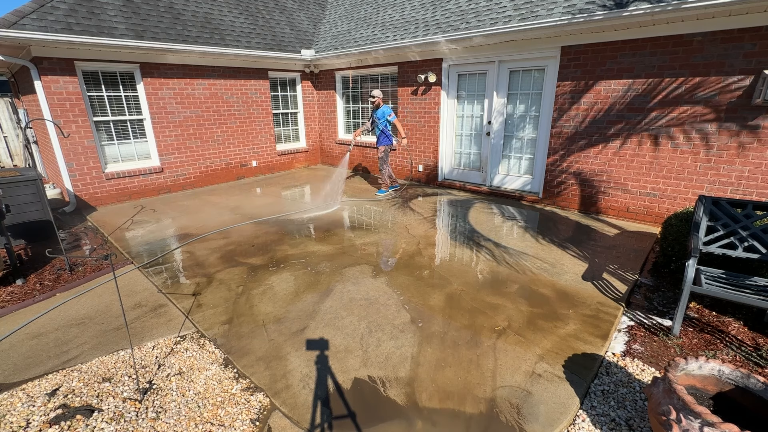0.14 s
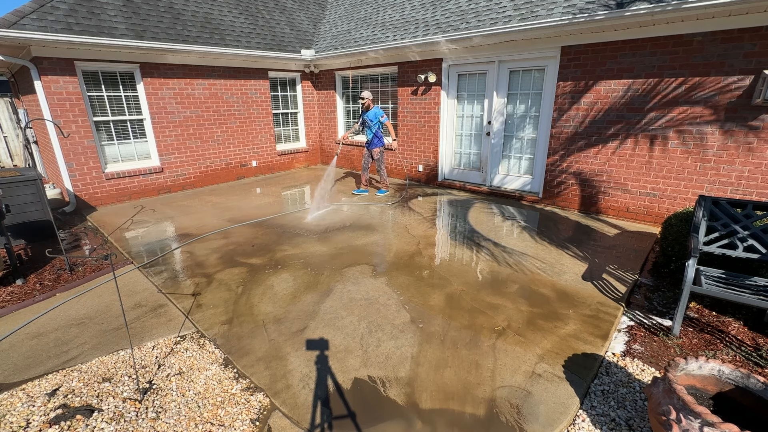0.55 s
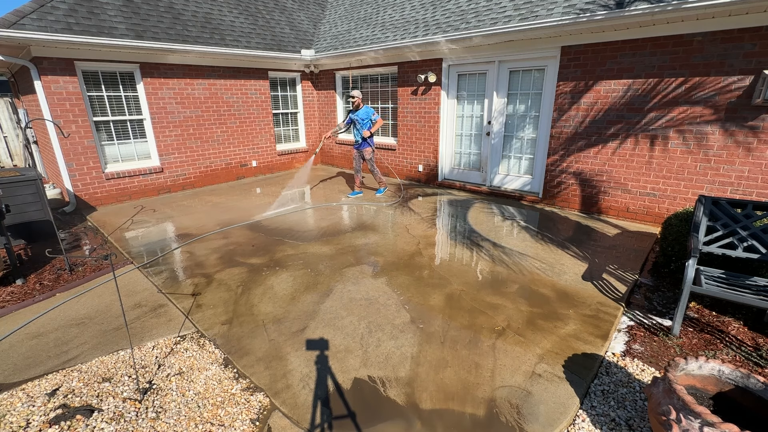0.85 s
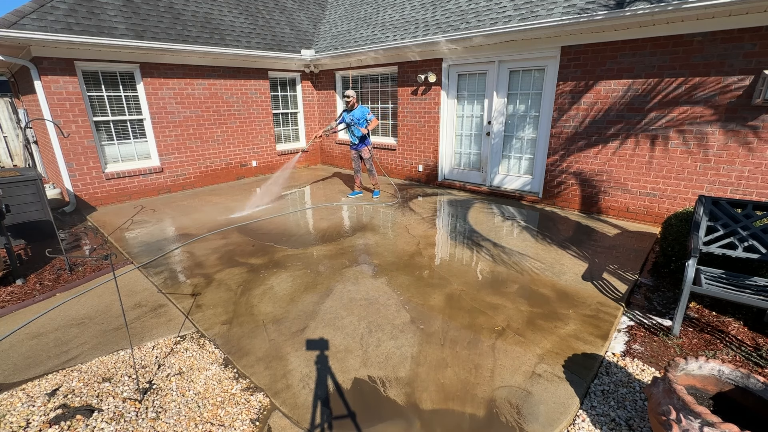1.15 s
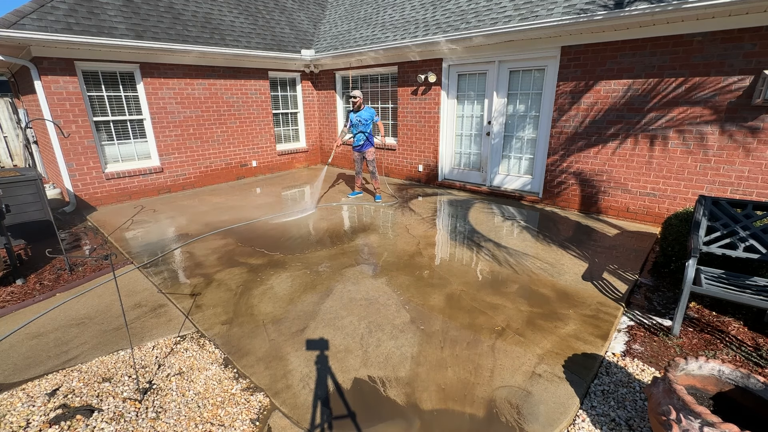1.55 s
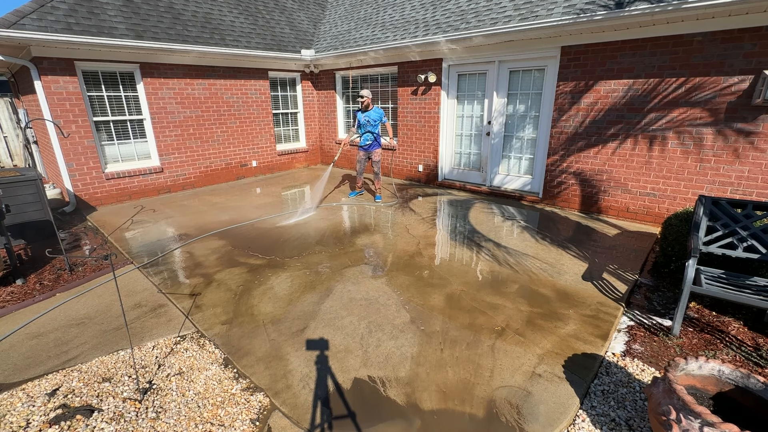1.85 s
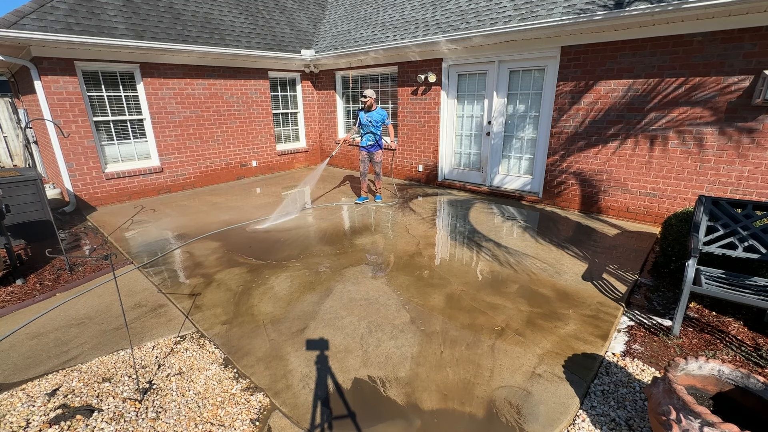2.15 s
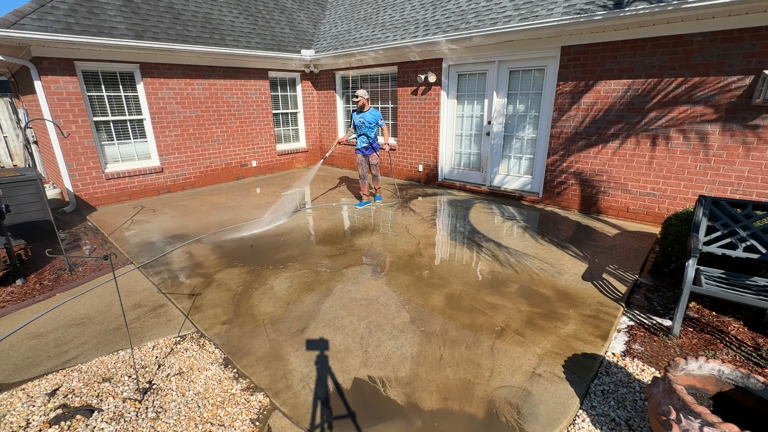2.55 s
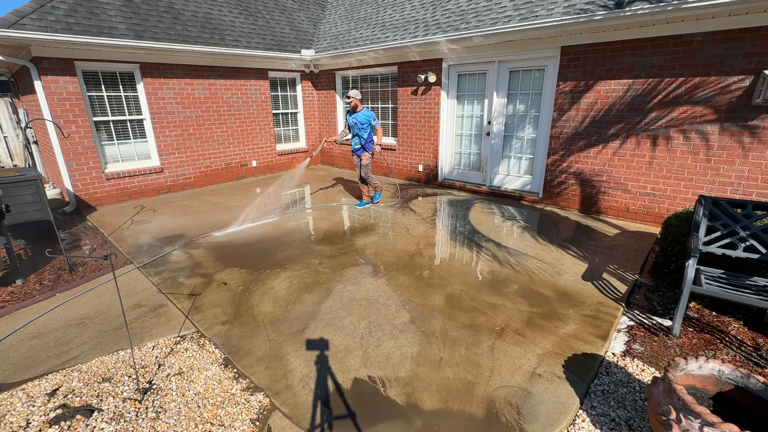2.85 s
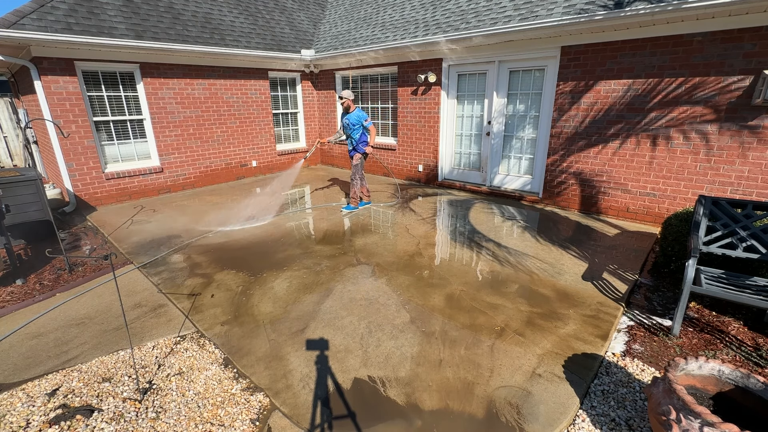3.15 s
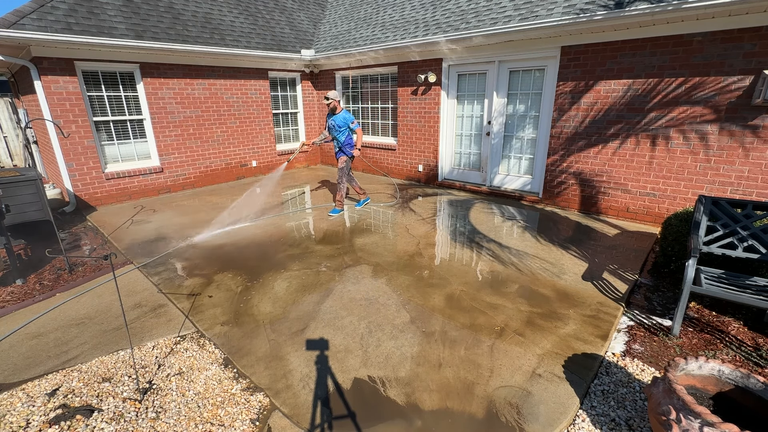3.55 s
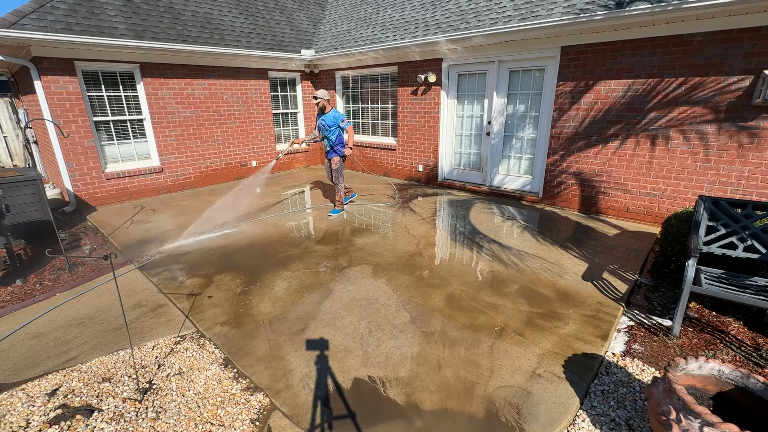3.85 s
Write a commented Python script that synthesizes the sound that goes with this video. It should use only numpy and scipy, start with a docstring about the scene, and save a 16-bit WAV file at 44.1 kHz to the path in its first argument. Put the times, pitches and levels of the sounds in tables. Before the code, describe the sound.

A pressure-washer jet hisses and splashes over wet concrete while small engines drone low behind it.

```python
"""A pressure-washer jet sweeps over wet concrete in a yard, with two small engines droning throughout.
One drop lands nearby at 0.2 s, just before the jet's fizz peaks at 0.3 s; the fizz then rises and falls
over its splash, a fuzzy whistle and a roar, all of shaped noise. The engines and hums are drifting sines
over a noise rumble, strongest near 3.2 s. Short puffs of wind noise recur, the strongest after 3.6 s."""
import sys
import numpy as np
from scipy import signal
from scipy.io import wavfile
from scipy.ndimage import uniform_filter1d

SR = 44100
rng = np.random.default_rng(int(sys.argv[2]) if len(sys.argv) > 2 else 0)


def int16_out(signal):
    """Quantize to a 16-bit WAV file."""
    q = np.round(np.clip(np.atleast_2d(signal).T, -1, 1) * 32767)
    wavfile.write(sys.argv[1], SR, q.astype(np.int16))


N = 176400
SIZE, HOP = 1024, 256  # samples

# The wand's sweep. Each row: time in seconds, jet fizz in dB and slab splash in dB, both before trim.
SWEEP = [(0.0, -31.5, -35.8), (0.1, -31.6, -34.5), (0.2, -30.1, -35.5), (0.27, -28.5, -34.8),
         (0.31, -26.8, -34.9), (0.36, -29.5, -36.1), (0.39, -31.2, -37.5), (0.46, -29.7, -36.2),
         (0.55, -30.1, -35.4), (0.65, -30.8, -35.4), (0.73, -30.1, -33.9), (0.85, -31.6, -34.9),
         (1.0, -31.9, -35.5), (1.17, -33.6, -36.6), (1.24, -31.7, -34.5), (1.3, -33.5, -36.5),
         (1.48, -34.3, -36.6), (1.54, -32.6, -35.8), (1.7, -31.5, -35.8), (1.86, -32.9, -36.4),
         (2.0, -30.6, -35.4), (2.15, -31.9, -36.2), (2.35, -33.6, -36.7), (2.55, -33.2, -36.2),
         (2.76, -32.5, -36.0), (2.93, -31.5, -33.0), (2.98, -33.9, -33.8), (3.2, -34.6, -35.6),
         (3.31, -31.8, -33.9), (3.38, -34.4, -34.7), (3.54, -32.8, -34.9), (3.6, -30.6, -33.4),
         (3.75, -33.6, -35.1), (4.0, -33.7, -35.0)]
# The backdrop. Each row: time in seconds, rumble in dB before trim, roar in dB before trim,
# lift of the roar's swelling band in dB, centre of that band in Hz.
BACKDROP = [(0, -49, -40, 3, 950), (.5, -42.5, -41, 0, 950), (1, -45, -41, 0, 930),
            (1.25, -42, -42, 2, 990), (1.4, -46, -42, 3.5, 1090), (1.6, -42, -41.5, 5, 1250),
            (1.8, -50, -41.5, -2, 1010), (2.1, -44, -41, 1, 750), (2.5, -44.5, -41, 2, 680),
            (2.9, -42, -41.5, 3, 680), (3.2, -39, -41.5, 1, 680), (3.5, -44, -42, 4.5, 690),
            (4, -48, -41, 5, 680)]


def amp(db):
    """Decibels to gain."""
    return 10 ** (np.asarray(db) / 20)


def evened(x):
    """Scales to rms 1."""
    return x / np.sqrt(np.mean(abs(x) ** 2) + 1e-20)


def column(table, at, axis):
    """Interpolates one column of a table along its first."""
    rows = np.asarray(table, float)
    return np.interp(at, rows[:, 0], rows[:, axis])


def colour(points, hz):
    """Gain of a spectrum interpolated in dB over log frequency, rms 1 over the bins."""
    f, db = np.transpose(points)
    shape_db = np.interp(np.log(hz + 1), np.log(f), db, -90, db[-1])
    return evened(amp(shape_db))


def slow(t, top_hz, span=20):
    """Slow random wander of rms 1: sines from top_hz / span up to top_hz, weaker as they get faster."""
    rates_hz = np.geomspace(top_hz / span, top_hz, 24)
    return evened(sum(np.sin(2 * np.pi * (f * t + rng.random())) / np.sqrt(f) for f in rates_hz))


def patches(hz, t, bins, frames):
    """Random blotches over frequency and time, rms 1."""
    field = rng.standard_normal((len(t), len(hz))).T
    field = uniform_filter1d(field, size=bins, axis=0)
    return evened(uniform_filter1d(field, size=frames, axis=1))


def stereo_spectra(hz, frames, apart):
    """Random left and right noise spectra, partly alike, with phase lead and level tilt by frequency.

    Unless apart, they are nearly opposite around 11 kHz and nearly identical around 14.5 kHz."""
    # Each row: frequency in Hz, likeness 0-1, left lead in rad, left-right level in dB.
    stereo_rows = [(40, .85, .11, .8), (110, .85, .21, .6), (250, .8, .2, 1.2), (520, .4, 1.2, 2),
                   (1200, .35, 2.6, 3), (2200, .36, 1.8, .8), (3100, .36, 3.1, 2), (3650, .4, 3.1, 2),
                   (3950, .08, 4.5, 2), (4400, .22, 6.1, 3), (5400, .18, 4.8, 5), (7400, .15, 7, 2),
                   (9200, .42, 4.7, -.5), (9650, .62, 5.6, 0), (10400, .87, 3.5, 0), (10750, .99, np.pi, 0),
                   (11550, .995, np.pi, 0), (11900, .87, 2.55, 0), (13700, .89, .55, 0), (14000, .99, 0, 0),
                   (14950, .99, 0, 0), (15300, .86, -.75, 0), (15800, .85, -1, 0)]
    wind_likeness = -0.45  # left and right partly opposite
    a, b, c, d = rng.standard_normal((frames, len(hz), 4)).T
    likeness = wind_likeness if apart else column(stereo_rows, hz, axis=1)[:, None]
    same = np.clip(likeness, -1, 1)
    lead_rad = column(stereo_rows, hz, axis=2)[:, None]
    tilt_db = column(stereo_rows, hz, axis=3)[:, None]
    left = a + 1j * b
    own = c + 1j * d
    right = (same * left + np.sqrt(1 - same ** 2) * own) * np.exp(-1j * lead_rad)
    return np.array([left * amp(tilt_db / 2), right * amp(-tilt_db / 2)])


def noises(size, hop, power, apart=False):
    """Renders a power field over frequency and time as two-channel noise; power 1 gives about rms 1."""
    hz = np.fft.rfftfreq(size, 1 / SR)
    t = np.arange(N // hop + 5) * hop / SR
    z = stereo_spectra(hz, len(t), apart)
    unit = np.std(signal.istft(z[0], nperseg=size, noverlap=size - hop)[1])
    shaped = z * np.sqrt(power(hz, t))
    return signal.istft(shaped, nperseg=size, noverlap=size - hop)[1][:, :N] / unit


def fizz(hz, t, flicker_db):
    """Power of the jet's high noise band, following the sweep."""
    # Each row: frequency in Hz, relative level in dB per Hz.
    fizz_spectrum = [(7000, -30), (8500, -10), (10000, -4.5), (10700, -1.5), (11800, -1.5), (13200, .6),
                     (14500, .3), (15800, .6)]
    trim_db = 3.8
    level_db = column(SWEEP, t, axis=1) + trim_db + flicker_db
    return (colour(fizz_spectrum, hz)[:, None] * amp(level_db)) ** 2


def splash(hz, t, flicker_db):
    """Power of the spray on the slab: a mid-to-high noise band with the jet's flicker."""
    # Each row: frequency in Hz, relative level in dB per Hz.
    splash_spectrum = [(1800, -45), (3000, -4.5), (4300, -1.5), (5600, -0.5), (6600, -1), (7600, -4.5),
                       (9000, -2.5), (11000, -10.5)]
    trim_db = 1.6
    level_db = column(SWEEP, t, axis=2) + trim_db + flicker_db
    return (colour(splash_spectrum, hz)[:, None] * amp(level_db)) ** 2


def whistle(hz, t):
    """Power of a fuzzy whistle: a narrow noise peak with wandering centre and uneven strands."""
    # Each row: time in seconds, level in dB before trim, centre in Hz before wander.
    whistle_path = [(0.0, -42, 2570), (0.28, -38, 2620), (0.5, -40, 2680), (0.75, -40.5, 2730),
                    (1.0, -41, 2670), (1.3, -40.5, 2700), (1.6, -40.5, 2720), (1.9, -41, 2620),
                    (2.15, -40.5, 2700), (2.4, -39.5, 2720), (2.6, -41, 2720), (2.8, -40, 2760),
                    (3.1, -41.5, 2720), (3.5, -41.5, 2730), (4.0, -40, 2660)]
    width_hz, wander_hz = 250, 18
    trim_db, strands_db = 1.1, 2.0
    centre_hz = column(whistle_path, t, axis=2) + wander_hz * slow(t, top_hz=9.2)
    peak = 1 / (1 + ((hz[:, None] - centre_hz) / width_hz) ** 2) ** 2
    strands = strands_db * patches(hz, t, bins=3, frames=10)
    level_db = column(whistle_path, t, axis=1) + trim_db + strands
    return (evened(peak) * amp(level_db)) ** 2


def roar(hz, t):
    """Power of a broad roar with one band that drifts and swells."""
    # Each row: frequency in Hz, relative level in dB per Hz.
    roar_spectrum = [(150, -9), (300, -1), (600, -3.5), (900, 0), (1500, -1), (2100, -2), (3300, -4),
                     (5000, -29)]
    trim_db, swell_width_hz = 5.5, 154
    offset = (hz[:, None] - column(BACKDROP, t, axis=4)) / swell_width_hz
    swell_db = np.exp(-offset ** 2) * column(BACKDROP, t, axis=3)
    level_db = column(BACKDROP, t, axis=2) + trim_db + swell_db
    return (colour(roar_spectrum, hz)[:, None] * amp(level_db)) ** 2


def water(hz, t):
    """Summed, patchy power of the water; fizz and splash flicker together where droplets bunch."""
    flicker_rms_db, surge_rms_db, patchy_rms_db = 0.5, 0.43, 1.08
    flicker_db = flicker_rms_db * rng.standard_normal(len(t)) + surge_rms_db * slow(t, top_hz=20, span=4)
    total = fizz(hz, t, flicker_db) + splash(hz, t, flicker_db) + roar(hz, t) + whistle(hz, t)
    return total * amp(patchy_rms_db * patches(hz, t, bins=12, frames=9)) ** 2


def drops():
    """One drop lands nearby: a very short tone burst under a Gaussian envelope."""
    # Each row: time in seconds, peak in dB, pitch in Hz, left-right level in dB.
    drop_rows = [(.2126, -22, 1470, 7)]
    width_s = 0.00054
    t = np.arange(N) / SR
    out = np.zeros((2, N))
    for s, db, hz, pan_db in drop_rows:
        gains = amp(db + np.array([[pan_db], [-pan_db]]) / 2)
        out += gains * np.exp(-((t - s) / width_s) ** 2) * np.sin(2 * np.pi * hz * (t - s))
    return out


def engine(firing_hz, drift, orders):
    """Sines on multiples of a slightly drifting rate (drift: rms share), each wavering in level."""
    waver_rms_db = 0.64
    t = np.arange(N) / SR
    coarse = t[::HOP]
    speed = 1 + drift * np.interp(t, coarse, slow(coarse, top_hz=3.13))
    turn = 2 * np.pi * np.cumsum(firing_hz * speed) / SR
    out = np.zeros((2, N))
    for multiple, db, pan_db, lead_rad in orders:
        phase = np.round(multiple) * turn + 2 * np.pi * rng.random()
        waver_db = waver_rms_db * np.interp(t, coarse, slow(coarse, top_hz=9.9))
        level = np.sqrt(2) * amp(db + waver_db)  # rms to peak
        left = amp(pan_db / 2) * np.sin(phase + lead_rad)
        right = amp(-pan_db / 2) * np.sin(phase)
        out += level * [left, right]
    return out


def slow_engine():
    """The slower engine's drone: orders of its firing rate."""
    # Each row: multiple of the firing rate, rms level in dB, left-right level in dB, left lead in rad.
    slow_orders = [(2, -44.5, -1, 0.5), (3, -52.5, 5, -0.6), (5, -39.5, -0.5, 0.58), (6, -57, 9, -0.5),
                   (7, -76, -7, -0.5), (8, -51, 2, -0.3), (9, -64, 0, -0.5), (28, -57, -2, 3.5)]
    return engine(firing_hz=27.545, drift=0.00049, orders=slow_orders)


def fast_engine():
    """The faster engine's drone: orders of its firing rate, drifting more."""
    # Each row: multiple of the firing rate, rms level in dB, left-right level in dB, left lead in rad.
    fast_orders = [(2, -50.5, 1, 0.16), (4, -52.5, 2, .2), (5, -47.5, -10, 0.15), (7, -57, 8, 0.09),
                   (8, -57, -3, .1), (18, -55, 1, 1.5), (19, -58, 9.5, 2.36), (20, -59, 0, 2.1),
                   (24, -64.5, 9.5, 2.4), (29, -68, 9, 2), (30, -64.5, 1, 1.2), (40, -61, 7, 3.5)]
    return engine(firing_hz=29.596, drift=0.001, orders=fast_orders)


def hums():
    """Faint low hums: single sines, each with its own slight drift and waver."""
    # Each row: frequency in Hz, rms level in dB, left-right level in dB, left lead in rad.
    hum_rows = [(64.6, -52, -1, .2), (104, -58, 1, 0.34), (182.3, -60.5, -3, .2)]
    return sum(engine(hz, 0.00054, [(1, *rest)]) for hz, *rest in hum_rows)


def rumble(hz, t):
    """Power of the low noise under the engines, its level following the backdrop."""
    # Each row: frequency in Hz, relative level in dB per Hz.
    rumble_spectrum = [(22, -37), (30, -21), (45, -13.5), (60, -0.5), (100, -2), (170, -11), (300, -18.5),
                       (500, -28.5)]
    trim_db = 3.0
    level_db = column(BACKDROP, t, axis=1) + trim_db
    return (colour(rumble_spectrum, hz)[:, None] * amp(level_db)) ** 2


def wind(hz, t):
    """Power of wind puffs on the microphone: low noise under Gaussian power envelopes."""
    # Each row: frequency in Hz, relative level in dB per Hz.
    wind_spectrum = [(22, -30), (35, -19), (50, -13), (75, 7), (110, -2), (135, -11), (250, -21),
                     (400, -62)]
    # Each row: centre in seconds, Gaussian half-width (to 1/e power) in seconds, peak level in dB.
    puff_rows = [(0.045, 0.022, -40), (.88, .05, -43), (.97, 0.033, -42), (1.08, .04, -47),
                 (1.208, .025, -44), (1.38, .03, -46), (1.462, 0.023, -38), (1.62, 0.033, -38),
                 (1.82, .025, -46), (2.15, .04, -51), (2.47, .03, -52), (2.73, 0.028, -43),
                 (3.103, 0.044, -40), (3.25, .06, -42), (3.576, .05, -39), (3.666, 0.068, -28.5),
                 (3.798, 0.048, -33.5), (3.946, 0.034, -28.5)]
    puffs = sum(amp(db) ** 2 * np.exp(-((t - s) / width_s) ** 2) for s, width_s, db in puff_rows)
    return colour(wind_spectrum, hz)[:, None] ** 2 * puffs


def scene():
    """Water, a drop, both engines, faint hums, rumble and wind."""
    washer = noises(SIZE, HOP, water) + drops()
    drone = slow_engine() + fast_engine() + hums()
    low_noise = noises(4 * SIZE, 4 * HOP, rumble)
    gusts = noises(2 * SIZE, HOP, wind, apart=True)
    return washer + drone + low_noise + gusts


def record(dry):
    """The recorder's band limit: a steep linear-phase low-pass."""
    edge_hz = 15740
    lowpass = signal.firwin(2047, edge_hz, window=("kaiser", 9), fs=SR)
    return signal.oaconvolve(dry, lowpass[None], "same")


dry = scene()
out = record(dry)
int16_out(out)
```